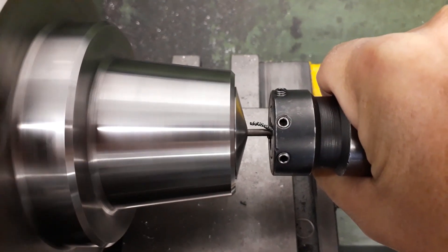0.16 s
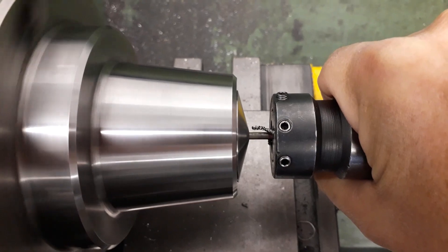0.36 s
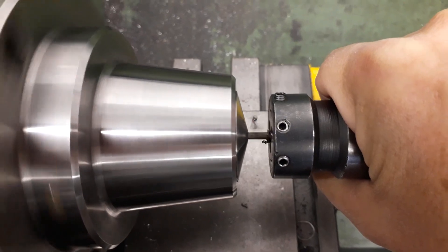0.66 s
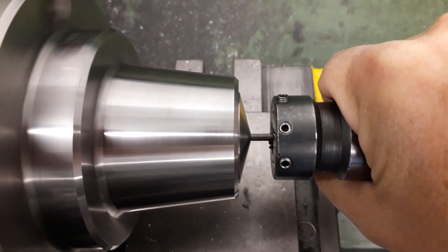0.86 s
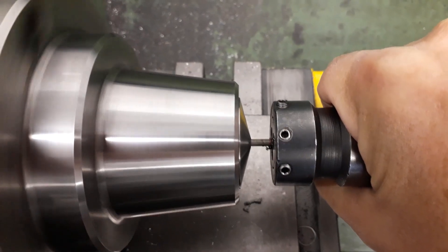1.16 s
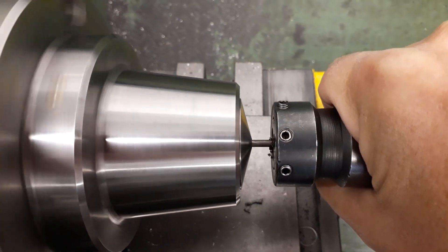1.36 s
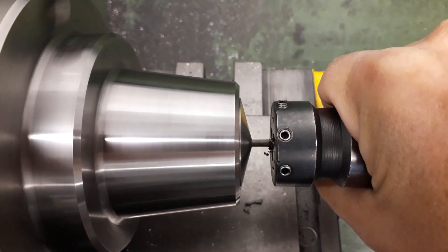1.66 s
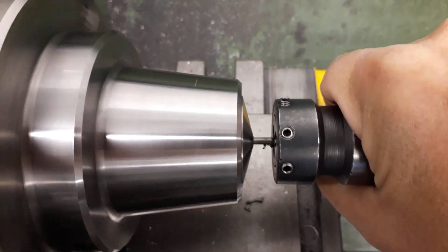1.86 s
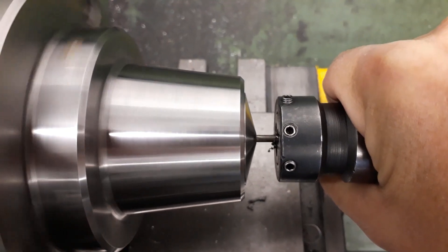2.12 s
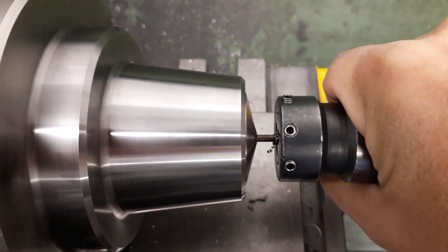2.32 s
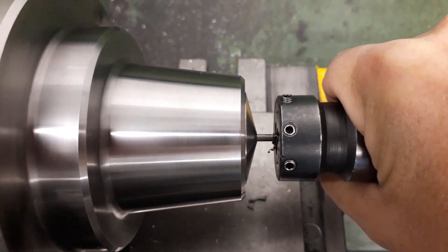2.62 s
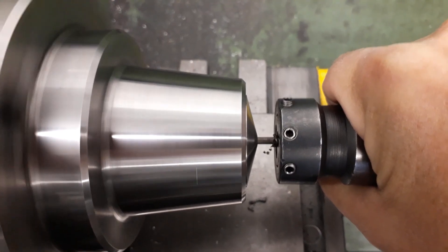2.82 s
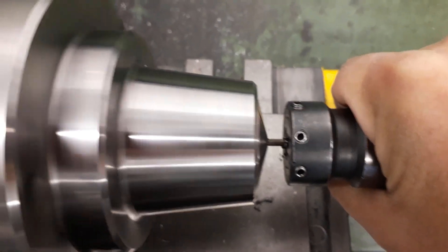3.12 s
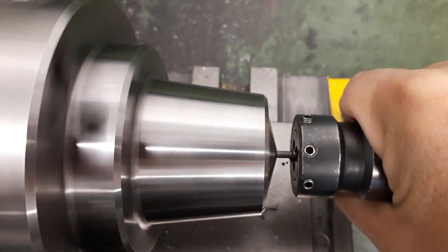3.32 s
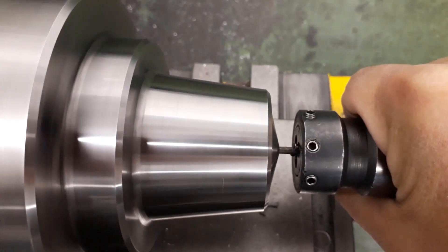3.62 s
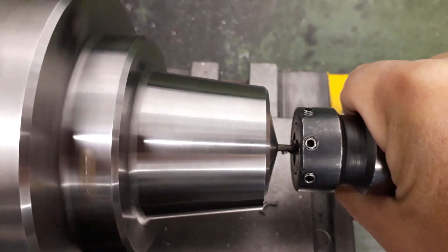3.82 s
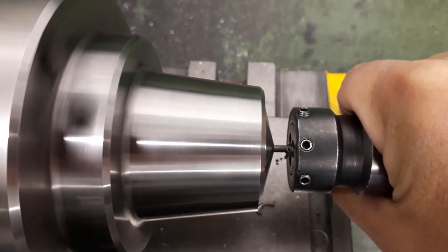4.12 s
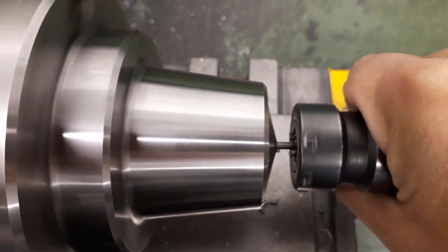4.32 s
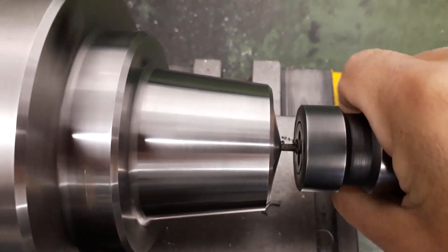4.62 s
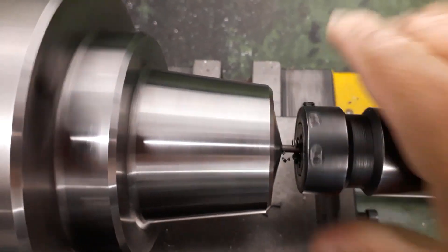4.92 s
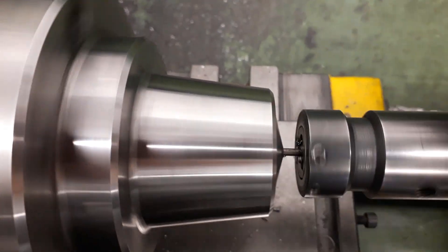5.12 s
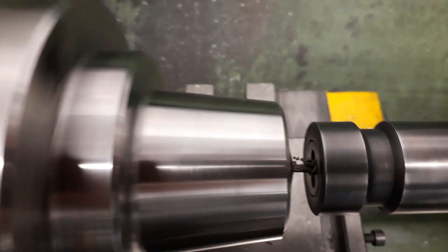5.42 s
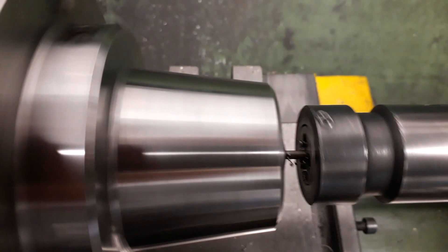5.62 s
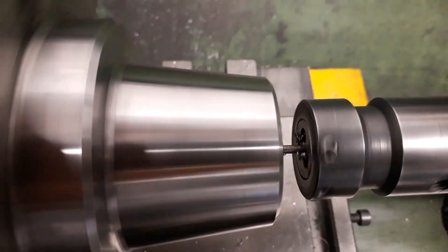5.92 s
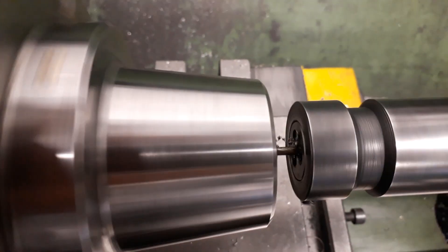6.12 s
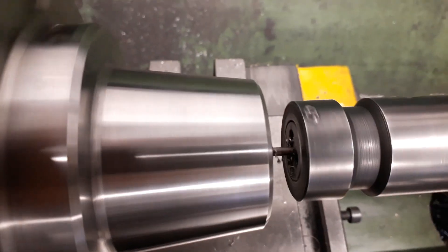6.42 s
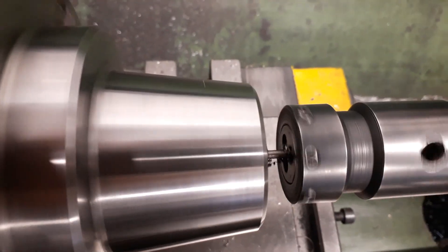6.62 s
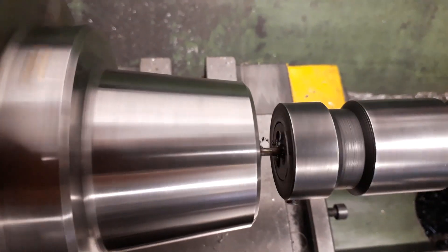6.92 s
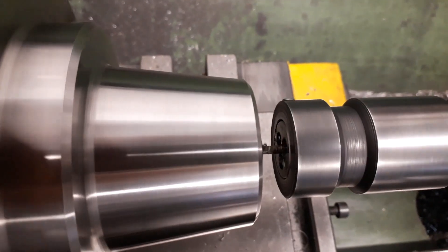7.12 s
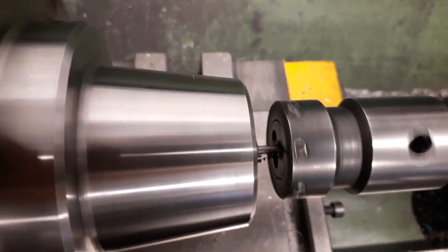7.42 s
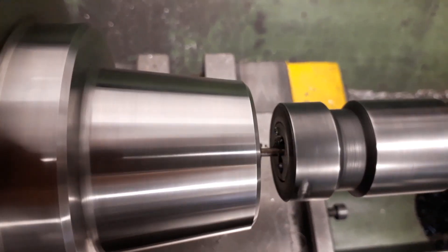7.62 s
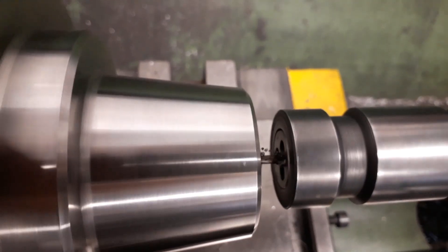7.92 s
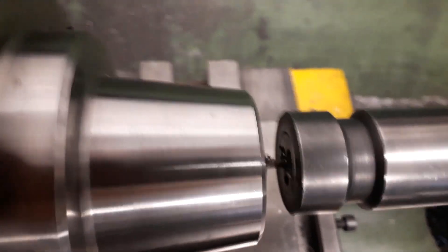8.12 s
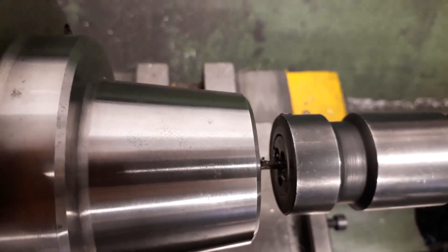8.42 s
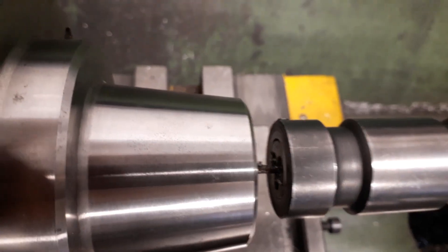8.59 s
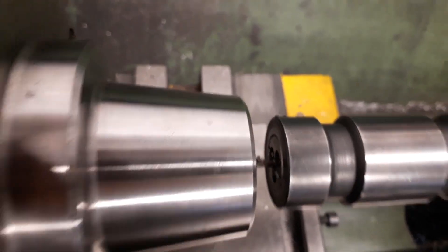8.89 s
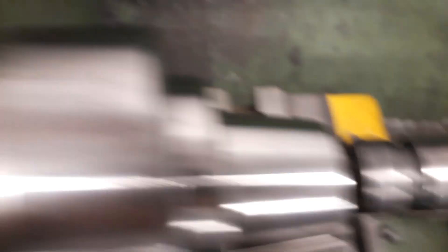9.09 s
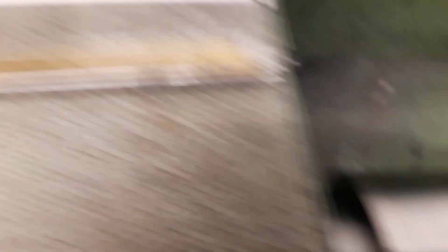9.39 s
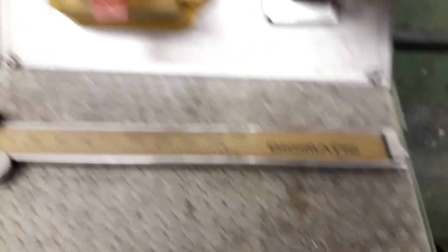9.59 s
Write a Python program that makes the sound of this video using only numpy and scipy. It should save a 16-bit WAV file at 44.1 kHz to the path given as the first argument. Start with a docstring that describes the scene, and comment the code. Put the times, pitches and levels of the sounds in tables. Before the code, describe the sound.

Close to a running lathe in a workshop, a steady motor hum and gear churn carry regular metallic ticks, with faint scrapes from a die cutting a thread. Skin rubs briefly on steel, the released holder whirrs lightly and the ticks grow a little stronger. Several light knocks lead to the sharp, ringing clack of the stop lever. The hum dies away under a quick run of heavy clunks, leaving faint hiss.

```python
"""A metal lathe turns slowly in a workshop while a hand-held die cuts a thread; close, near-mono microphone.
The motor hums, the gears churn through the headstock casting and the drive clicks twice a turn.
The die slides and catches on the rod until the hand lets go and its holder whirrs along.
After a few light knocks a lever stops the machine with a clack, the gear train clunks and rattles
to rest, and the workshop falls quiet."""
import sys
import numpy as np
from scipy import signal
from scipy.fft import rfft, irfft, next_fast_len
from scipy.io import wavfile
from scipy.ndimage import map_coordinates

SR = 44100
rng = np.random.default_rng(int(sys.argv[2]) if len(sys.argv) > 2 else 0)


def wav_record(signal):
    """Record a signal, one row per channel, as 16-bit PCM in the file named by sys.argv[1]."""
    frames = np.transpose(np.atleast_2d(signal))
    bounded = np.clip(frames, -1, 1)
    # unit amplitude maps onto the largest positive 16-bit level
    quanta = np.round(bounded * 32767).astype(np.int16)
    wavfile.write(sys.argv[1], SR, quanta)


N = 429975
STOP_S = 7.665  # the power is cut

# cutting load, falling as the hand lets go of the die: (t/s, load with 1 = full)
CUTTING_LOAD = [(4.3, 0.9), (5.6, 0)]
# low modes of the lathe bed: (f/Hz, level/dB, t60/s)
LATHE_BED_MODES = [(91, -7.5, 0.39), (131, -7.5, 0.24), (143, 1, 0.25), (190.3, 0, 0.17), (219, -11, 0.23)]
# bright edge of a hard steel blow: (f/Hz, level/dB)
CRACK_SPECTRUM = [(1000, -26.5), (3000, -18), (4400, -2.5), (5900, -4.5), (7400, -2.5), (9500, -4),
                  (12000, -3), (15500, -14)]


def amp(db):
    return 10 ** (np.asarray(db) / 20)


def unit(x):
    return x / np.sqrt(np.mean(x ** 2) + 1e-20)


def clock(size=N):
    return np.arange(size) / SR


def along(points, hz):
    """Read (f/Hz, value) points on a log frequency axis."""
    f, values = np.transpose(points)
    return np.interp(np.log(hz + 1), np.log(f + 1), values)


def at(points, t):
    """Read (t/s, value) points at time t."""
    return np.interp(t, *np.transpose(points))


def wobble(rate):
    """A smooth random curve, rate knots a second."""
    return map_coordinates(rng.standard_normal(int(N * rate / SR) + 4), [clock() * rate])


def filtered(x, response):
    """Filter x by a complex response of frequency."""
    size = x.shape[-1]
    padded = next_fast_len(size + 8192)
    return irfft(rfft(x, padded) * response(np.fft.rfftfreq(padded, 1 / SR)), padded)[..., :size]


def noise(spectrum, size=N):
    """Noise of rms 1, coloured by (f/Hz, level/dB) points."""
    return unit(filtered(rng.standard_normal(size), lambda hz: amp(along(spectrum, hz))))


def add(track, s, sound):
    """Mix a sound into the track at time s."""
    part = track[round(s * SR):][:len(sound)]
    part += sound[:len(part)]


def burst(spectrum, t60, hold, wet_db):
    """A contact: dense steel modes, driven for hold seconds, dying into a diffuse workshop tail."""
    workshop_decay = [(100, 0.37), (400, 0.49), (1500, 0.28), (5000, 0.27), (8000, 0.25), (15000, 0.25)]  # reverberation of the room: (f/Hz, t60/s)
    t = clock(SR // 2)
    direct = noise(spectrum, len(t)) * amp(-60 * np.maximum(t - hold, 0) / t60)
    hz, age, bands = signal.stft(noise(spectrum, len(t)), SR, nperseg=256)
    decay = amp(-60 * age / along(workshop_decay, hz)[:, None])
    _, tail = signal.istft(bands * decay, SR, nperseg=256)
    return direct + amp(wet_db) * tail[:len(t)]


def ring(modes, scatter_db=2):
    """Damped modes, struck at new strengths and slightly new pitches each time."""
    t = clock(SR // 2)
    hz, db, t60 = np.transpose(modes)[:, :, None]
    strength, detune = rng.standard_normal((2, len(modes), 1))
    build_up = 1 - np.exp(-2 * hz * t)
    waves = np.sin(2 * np.pi * hz * (1 + 0.0054 * detune) * t) * build_up
    return np.sum(amp(db + scatter_db * strength - 60 * t / t60) * waves, axis=0)


def power(t60):
    """Full level until the stop, then dying away."""
    return amp(-60 * np.maximum(clock() - STOP_S, 0) / t60)


def turns(loose=False, turn_s=0.79765, first_s=0.2228):
    """Times of the tight click that starts each spindle turn, or of the loose one half a turn later."""
    drive_lag = [(0.2, -.0044, -0.0052), (1.4, 0.0012, -0.0044), (3.0, 0.0024, 0.0083),
                 (4.1, .0005, 0.0087), (5.6, -.011, -.005), (7.4, .001, 0.012)]  # wander around even turning: (t/s, tight lag/s, loose lag/s)
    even = np.arange(first_s + (turn_s / 2 if loose else 0), STOP_S, turn_s)
    s, tight_lag, loose_lag = np.transpose(drive_lag)
    return even + np.interp(even, s, loose_lag if loose else tight_lag)


def motor(buzz_hz=100, waver_db=1.1, drift_rad=0.18, fade_s=1.7):
    """Magnetic buzz on multiples of twice the mains rate, coloured by load; the lowest note dies last."""
    harmonics = [(-65, -67), (-56, -58.5), (-58.5, -59.5), (-63, -62.5), (-63.5, -62), (-71.5, -68),
                 (-72.5, -65), (-64, -64.5), (-54.5, -56), (-50.5, -55), (-57, -57.5), (-74, -68.5),
                 (-57, -62), (-69, -68), (-66, -64), (-75, -72.5), (-84.5, -77), (-73.5, -72), (-70, -68.5),
                 (-79, -74.5), (-86, -74), (-82, -70), (-69.5, -86), (-71, -71.5)]  # motor harmonics 1, 2, 3 ..: (cutting level/dB, idling level/dB)
    load = at(CUTTING_LOAD, clock())
    phase = 2 * np.pi * buzz_hz * clock()
    buzz = np.zeros(N)
    for k, (cutting_db, idle_db) in enumerate(harmonics, 1):
        db = idle_db + load * (cutting_db - idle_db) + waver_db * wobble(12)
        tone = np.sin(k * phase + rng.uniform(0, 2 * np.pi) + drift_rad * wobble(14))
        buzz += amp(db) * power(fade_s / k) * tone
    return np.sqrt(2) * buzz


def casting(f):
    """Response of the headstock casting: resonances of alternating sign."""
    resonances = [(274, 8.7, -5.5), (332.3, 15, -2), (439.4, 46, 2), (459.3, 30, 4), (528.5, 39, -1.5),
                  (642, 76, -3), (847, 88, -7), (1029, 100, -7.5), (1150, 38, -4), (1348, 91, -12),
                  (1830, 32, -13), (2140, 140, -17)]  # headstock modes: (f/Hz, width/Hz, level/dB)
    return sum((-1) ** k * amp(db) * 1j * f * width / (hz * hz - f * f + 1j * f * width)
               for k, (hz, width, db) in enumerate(resonances))


def gears(mesh_hz=53.5, throb=0.16, ring_db=-53, rush_db=-55.5):
    """Meshing teeth churn in pulses and excite the headstock casting."""
    rush_spectrum = [(30, 0), (60, -6), (105, -9), (220, 0.5), (450, -4), (700, -6.5), (1200, -4),
                     (1550, -10.5), (2400, -9.5), (4200, -20.5), (6800, -21), (7550, -12.5), (8300, -22),
                     (15500, -21)]  # noise straight from the teeth: (f/Hz, level/dB)
    teeth = 1 + throb * np.sin(2 * np.pi * mesh_hz * clock() + 0.52 * wobble(5.4))
    force = teeth * noise([(100, -11), (280, 0.5), (2300, 1.5), (4500, -18.5)])
    body = unit(filtered(force, casting))
    churn = amp(ring_db) * body + amp(rush_db) * teeth * noise(rush_spectrum)
    flutter_db = 0.5 * wobble(3) + 1.15 * wobble(16)
    return churn * amp(flutter_db) * power(t60=0.94)


def die(slide_db=-75, whirr_db=-64, held_db=-8, catch_idle_db=-4.5):
    """Steel slides on steel and catches at the same places each turn; the holder whirrs up once let go."""
    steel_spectrum = [(1500, -39.5), (4300, -20.5), (5000, -1.5), (5600, 1.5), (6400, -10), (7600, -5),
                      (10000, -18), (15500, -23.5)]  # the die rubbing the rod: (f/Hz, level/dB)
    whirr_spectrum = [(500, -25), (1800, -7.5), (2800, 9.5), (4300, -3), (6500, -10.5), (9500, -10.5),
                      (15500, -4)]  # the spinning holder: (f/Hz, level/dB)
    catches = [(0.227, -46), (0.286, -54), (0.525, -55)]  # where the die snags: (t/s after the tight click, level/dB)
    load = at(CUTTING_LOAD, clock())
    slide = noise(steel_spectrum) * amp(slide_db + 3 * wobble(6) + 1.5 * wobble(30))
    whirr = noise(whirr_spectrum) * amp(whirr_db + held_db * load + 0.8 * wobble(21))
    out = (slide + whirr) * power(t60=0.5)
    for start in turns():
        idle = 1 - at(CUTTING_LOAD, start)
        for delay, db in catches:
            scrape = burst(steel_spectrum, t60=0.02, hold=0.003, wet_db=-15.5)
            gain = amp(db + catch_idle_db * idle + 1.2 * rng.standard_normal())
            add(out, start + delay, gain * scrape)
    return out


def thud():
    """The hollow answer of the headstock to a blow."""
    blow_spectrum = [(150, -8), (300, -0.5), (550, -10), (900, -14), (1300, -4.5), (3000, -28)]  # force on the casting: (f/Hz, level/dB)
    return filtered(burst(blow_spectrum, t60=0.023, hold=0.0012, wet_db=-11), casting)


def click(body_db, snap_db=-4, ring_db=-7, thud_db=-3):
    """One contact in the drive: a steel snap, a brief ring and a knock on the headstock."""
    snap_spectrum = [(1000, -42), (3000, -13), (4100, -10.5), (5000, -7), (5700, -8.5), (6500, -4),
                     (7600, -3.5), (8200, -7), (9300, -10.5), (11500, -7.5), (13200, -5.5), (15500, -14)]  # bright edge of the contact: (f/Hz, level/dB)
    body_spectrum = [(150, -19.5), (300, -0.5), (700, -7.5), (1300, -5), (1800, -2.5), (2400, 0.5),
                     (2700, -3.5), (3300, -2.5), (3800, -18), (6000, -18.5), (15000, -42.5)]  # its duller body: (f/Hz, level/dB)
    drive_modes = [(1710, -14.5, 0.097), (1855, -12.5, 0.096), (2332, -13.5, 0.094), (2797, -12.5, 0.056),
                   (3294, -10.5, 0.058), (4995, -12, 0.061), (5400, -10.5, 0.034), (6460, -1, 0.028),
                   (6640, -1, .03), (7180, -3, 0.041), (10040, -12, 0.049), (13020, -13, 0.045)]  # ringing drive parts: (f/Hz, level/dB, t60/s)
    snap_gain, body_gain = amp(rng.standard_normal(2))
    snap = snap_gain * amp(snap_db) * burst(snap_spectrum, t60=0.026, hold=0.0009, wet_db=-12.5)
    body = body_gain * amp(body_db) * burst(body_spectrum, t60=0.036, hold=0.0011, wet_db=-9.5)
    return snap + body + amp(ring_db) * ring(drive_modes, scatter_db=2.1) + amp(thud_db) * thud()


def drive_clicks(tight_db=-2, tight_rebound_db=2, loose_rebound_db=-1.7, loose_rebound_s=0.0245):
    """The drive snaps over twice a turn: tight with a quick rebound, then loose with a slow, softer one."""
    levels = [(0.2, -33), (2.6, -31.5), (4.8, -27.5), (7.4, -28.5)]  # strength of the clicks: (t/s, level/dB)
    tight_play = [(0.2, .004), (3.4, .0115)]  # the tight click's play opens up: (t/s, rebound delay/s)
    coast_click = (7.8565, -30.5, .006)  # last click as the spindle coasts: (t/s, level/dB, rebound delay/s)
    tight = [(s, at(levels, s) + tight_db, at(tight_play, s), tight_rebound_db) for s in turns()]
    loose = [(s, at(levels, s), loose_rebound_s, loose_rebound_db) for s in turns(loose=True)]
    out = np.zeros(N)
    for s, db, delay, rebound_db in tight + loose + [(*coast_click, tight_rebound_db)]:
        add(out, s, amp(db) * click(body_db=-10))
        add(out, s + delay, amp(db + rebound_db) * click(body_db=-13.5))
    return out


def hand(attack_s=0.016, t60=0.33, rough_db=1.0):
    """Skin brushes the metal: each stroke rises quickly, holds and dies away."""
    brushes = [(4.257, 0.28, -49), (5.17, .12, -57), (8.232, .04, -59), (8.805, .06, -66.5),
               (8.937, 0.065, -64), (9.724, .05, -55)]  # strokes of the hand: (t/s, length/s, level/dB)
    skin_spectrum = [(400, -21), (1800, -3), (4000, -1), (6000, -2), (7600, 4), (9500, -0.5), (12000, 4.5),
                     (15500, 1.5)]  # skin rubbing steel: (f/Hz, level/dB)
    t, strokes = clock(), np.zeros(N)
    for s, length, db in brushes:
        rise = np.clip(1 + (t - s) / attack_s, 0, 1)
        strokes += rise * amp(db - 60 * np.maximum(t - s - length, 0) / t60)
    return noise(skin_spectrum) * strokes * amp(rough_db * wobble(60))


def knocks(body_db=-5, tick_db=-3):
    """Each knock sounds one short, hollow resonance of the part touched, under a steel tick."""
    touches = [(6.697, -33, 1320, -10), (7.083, -31, 800, -1.5), (7.090, -24, 720, -6),
               (7.478, -35, 2100, -2.5), (7.904, -41.5, 1340, -15)]  # light knocks on the controls: (t/s, level/dB, f/Hz, brightness/dB)
    tick_spectrum = [(400, -11), (1500, -9), (2800, -3), (3200, -3), (3700, -1.5), (5200, -14), (7500, -15),
                     (12000, -12), (15500, -20)]  # light steel contact: (f/Hz, level/dB)
    out = np.zeros(N)
    for s, db, hz, bright_db in touches:
        hollow = [(hz / 2, -30), (0.88 * hz, -1), (hz, 0), (1.25 * hz, -6), (2 * hz, -28)]
        body = amp(body_db) * burst(hollow, t60=0.096, hold=0.00176, wet_db=-18.5)
        tick = amp(bright_db + tick_db) * burst(tick_spectrum, t60=0.035, hold=0.0023, wet_db=-9)
        add(out, s, amp(db) * (body + tick))
    return out


def lever(clack_db=-9, ring_db=-20, crack_db=-3, thump_db=1):
    """The stop lever takes up its play, then slams home: steel rings and the bed thumps."""
    contacts = [(7.639, -24, -15, -17.5), (7.649, -21.5, -9, -15.5), (7.667, -5.5, -31, -8.5)]  # the lever's blows: (t/s, level/dB, thump/dB, brightness/dB)
    clack_spectrum = [(80, -19.5), (400, -6.5), (700, -9), (1350, 3.5), (2100, -0.5), (3000, -8.5),
                      (4200, 1.5), (6000, -16), (15000, -37)]  # midrange of each blow: (f/Hz, level/dB)
    steel_modes = [(977, -6, 0.27), (1050, -12, .2), (1242, -5.5, 0.13), (1336, 0, 0.13), (1770, -5.5, .16),
                   (1700, -8, 0.27), (2145, -3, 0.18), (2260, -12, .2), (2700, -10.5, .15),
                   (3850, -5.5, .1), (4200, -7.5, .13), (4420, -15.5, .15), (4540, -16, .16),
                   (7270, -19, .22), (7000, -14.5, .22)]  # the ringing lever: (f/Hz, level/dB, t60/s)
    out = np.zeros(N)
    for s, db, low_db, bright_db in contacts:
        clack = amp(clack_db) * burst(clack_spectrum, t60=0.038, hold=0.00091, wet_db=-11.5)
        crack = amp(bright_db + crack_db) * burst(CRACK_SPECTRUM, t60=0.04, hold=0.001, wet_db=-10.5)
        body = amp(ring_db) * ring(steel_modes) + amp(low_db + thump_db) * ring(LATHE_BED_MODES)
        add(out, s, amp(db) * (clack + crack + body))
    return out


def clunk(clang_db=-12, case_db=-21, crack_db=-3, thump_db=-2, thud_db=-12):
    """Heavy parts drop through their backlash in a quick run of blows on the gear case."""
    blows = [(8.273, -12, -16.5, -8.5), (8.292, -13, -15.5, -12.5), (8.326, -14.5, -24, -16),
             (8.348, -20.5, -13, -17.5), (8.364, -22.5, -18, -13.5), (8.381, -22, -7.5, -14.5),
             (8.402, -23, -24, -20), (8.417, -30.5, -13, -20), (8.802, -54.5, -23, -6)]  # the gear train rattling to rest: (t/s, level/dB, thump/dB, brightness/dB)
    clang_spectrum = [(80, -13), (300, -11.5), (750, -1.5), (1100, 0), (1600, -0.5), (2700, -0.5),
                      (3600, -4.5), (6000, -18), (15000, -22.5)]  # midrange of each blow: (f/Hz, level/dB)
    case_modes = [(380, -5, 0.28), (673, -2.5, 0.2), (718.7, -3, 0.28), (783, -5.5, 0.19), (1515, -2, .14),
                  (2530, -3.5, 0.14), (3240, -0.5, 0.11), (349.6, -28, 1.1)]  # the ringing gear case: (f/Hz, level/dB, t60/s)
    out = np.zeros(N)
    for s, db, low_db, bright_db in blows:
        clang = amp(clang_db) * burst(clang_spectrum, t60=0.05, hold=0.00098, wet_db=-7.5)
        crack = amp(bright_db + crack_db) * burst(CRACK_SPECTRUM, t60=0.05, hold=0.0015, wet_db=-7.5)
        body = amp(case_db) * ring(case_modes) + amp(low_db + thump_db) * ring(LATHE_BED_MODES)
        add(out, s, amp(db) * (clang + crack + body + amp(thud_db) * thud()))
    return out


def scene(air_db=-66, side_db=-78):
    """The lathe stands close and dead centre; left and right differ only by a very faint noise."""
    air_spectrum = [(25, 2.5), (55, 2.5), (90, 9), (160, 4.5), (300, -4), (800, -9.5), (2000, -14),
                    (6300, -15), (7500, -11.5), (9000, -7.5), (12000, -0.5), (15500, -8.5)]  # workshop room tone and hiss: (f/Hz, level/dB)
    side_spectrum = [(40, 13), (250, -18), (1500, -23.5), (3500, -1.5),
                     (7500, -2.5), (9000, 6.5), (15500, -7)]
    machine = motor() + gears() + die() + hand() + drive_clicks() + knocks() + lever() + clunk()
    mid = machine + amp(air_db) * noise(air_spectrum)
    side = amp(side_db) * noise(side_spectrum)
    return np.array([mid + side, mid - side])


def record(dry, low_cut_hz=75, top_hz=15800):
    """The microphone drops the deep bass, shelves the top treble down and passes nothing above top_hz."""
    treble_shelf = [(7750, 0), (8600, -13.5)]  # microphone response: (f/Hz, level/dB)
    low_cut = signal.butter(4, low_cut_hz, "highpass", fs=SR, output="sos")
    lean = signal.sosfilt(low_cut, dry)
    return filtered(lean, lambda hz: amp(along(treble_shelf, hz)) * (hz < top_hz))


dry = scene()
out = record(dry)
wav_record(out)
```